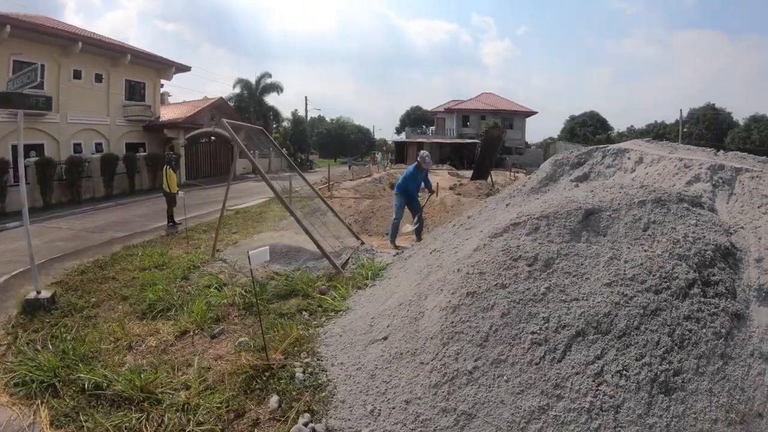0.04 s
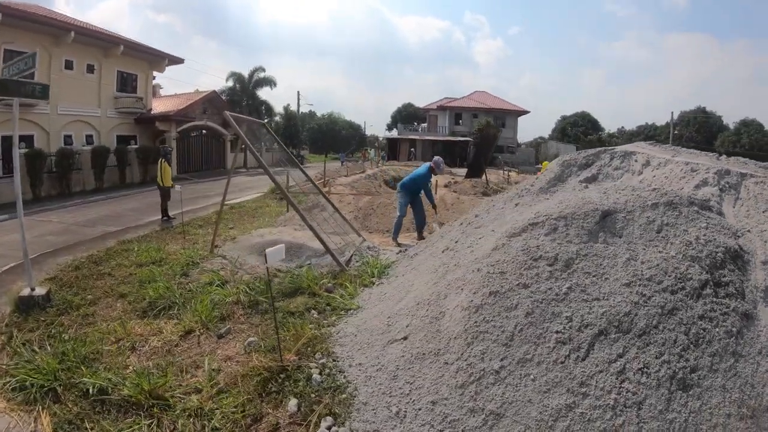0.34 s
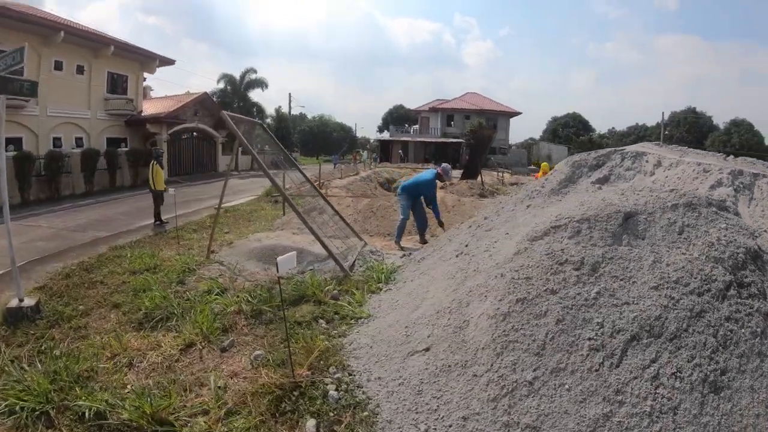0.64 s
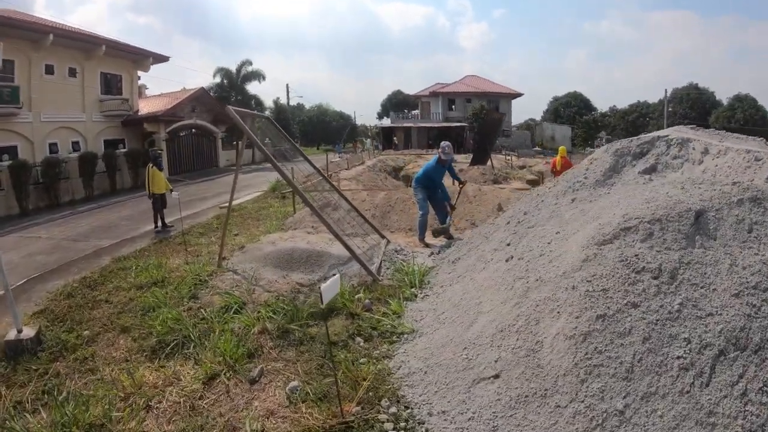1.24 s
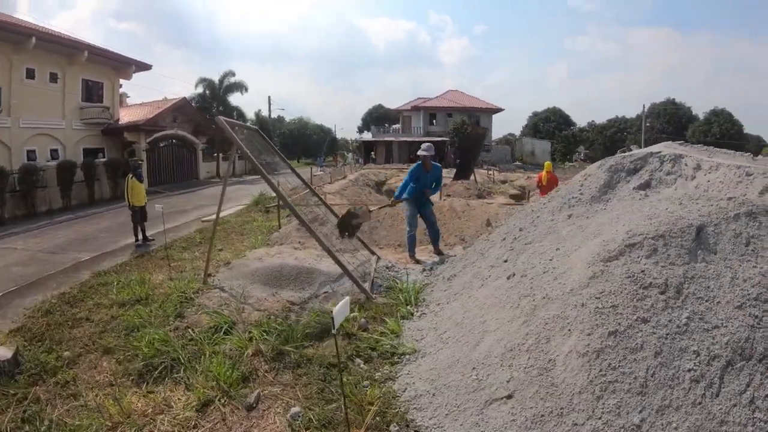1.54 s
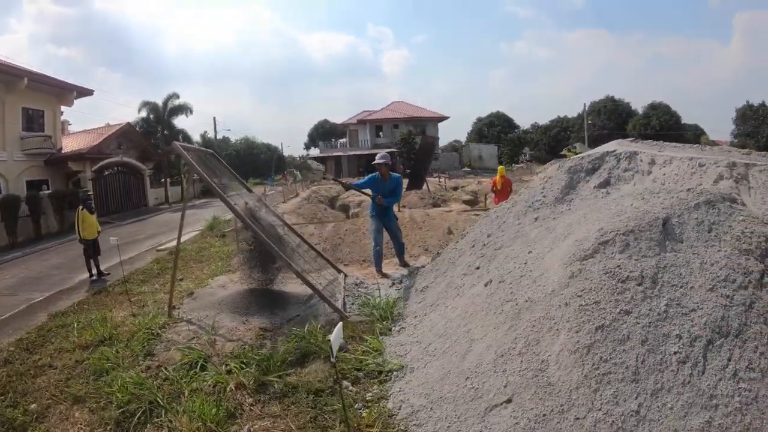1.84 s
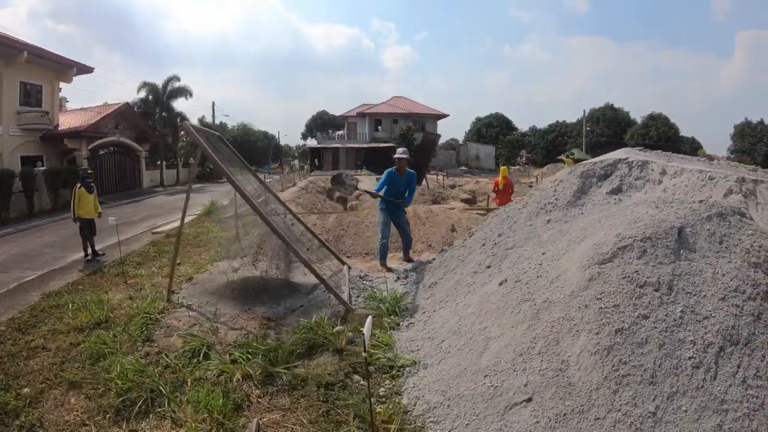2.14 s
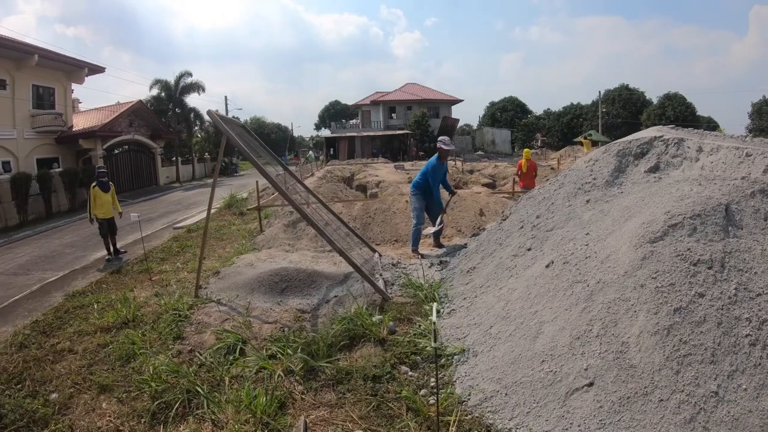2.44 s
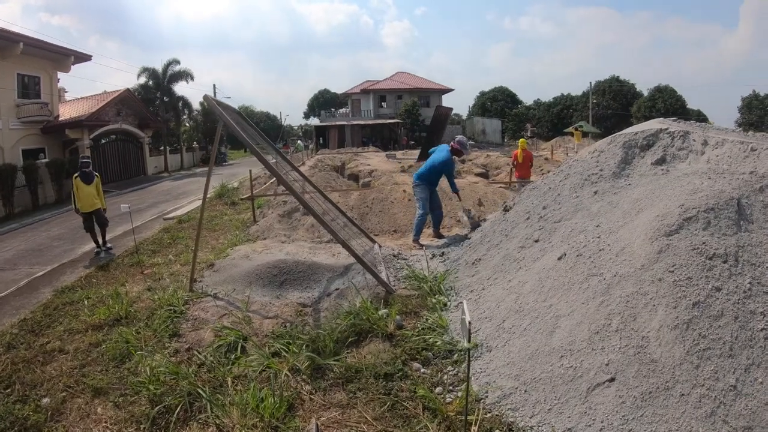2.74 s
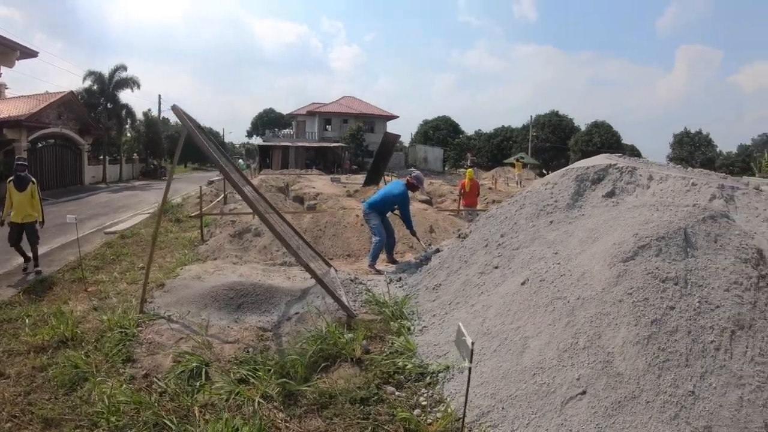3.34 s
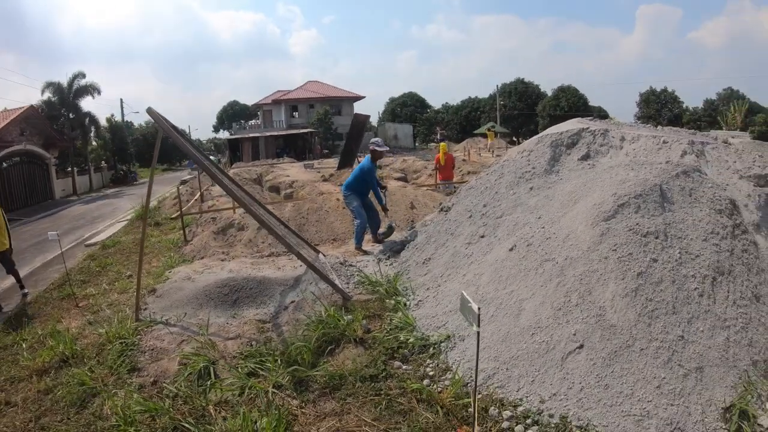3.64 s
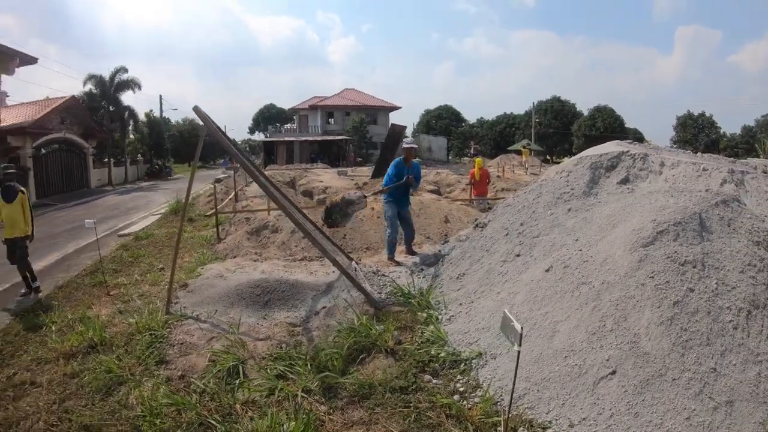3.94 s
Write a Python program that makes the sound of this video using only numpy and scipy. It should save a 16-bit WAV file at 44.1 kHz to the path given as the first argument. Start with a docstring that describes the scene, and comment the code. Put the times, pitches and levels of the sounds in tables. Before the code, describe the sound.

At an outdoor building site, sand hisses against wire mesh three times, the middle throw lasting longest. A shovel bites, scrapes and spills grit in between, with a few close knocks and low wind on the microphone.

```python
"""Gravelly sand, thrown by the shovelful, hisses on a sloped wire screen at an outdoor building site.
Grains pelt the mesh and ring its frame while the fine sand pours through. Between throws the blade
crunches into the heap, scrapes under it and lifts, spilling grit and chinking on stones.
A few sharp knocks sound close by, and wind rocks the microphone over faint outdoor air."""
import sys
import numpy as np
from scipy import signal
from scipy.fft import rfft, irfft, next_fast_len
from scipy.io import wavfile
from scipy.ndimage import map_coordinates

SR = 44100
rng = np.random.default_rng(int(sys.argv[2]) if len(sys.argv) > 2 else 0)


def wav_record(signal):
    """Record a signal, one row per channel, as 16-bit PCM in the file named by sys.argv[1]."""
    frames = np.transpose(np.atleast_2d(signal))
    bounded = np.clip(frames, -1, 1)
    # unit amplitude maps onto the largest positive 16-bit level
    quanta = np.round(bounded * 32767).astype(np.int16)
    wavfile.write(sys.argv[1], SR, quanta)


N = 176400
KNOCK_ATTACK_S = .0012


def amp(db):
    """Decibels to gain."""
    return 10 ** (np.asarray(db) / 20)


def unit(x):
    """Scale to rms 1."""
    return x / np.sqrt(np.mean(x ** 2) + 1e-20)


def curves(rows):
    """Automation lanes: one value per sample for each column after the time."""
    times, *columns = np.transpose(rows)
    return [np.interp(np.arange(N) / SR, times, column) for column in columns]


def wobble(per_s):
    """Smooth random modulation with per_s knots a second."""
    return map_coordinates(rng.standard_normal(1024), [np.arange(N) * per_s / SR], mode="wrap")


def filtered(x, response):
    """Filter x by a complex frequency response."""
    size = 2 * next_fast_len(N * 2 // 3)
    return irfft(rfft(x, size) * response(np.fft.rfftfreq(size, 1 / SR)), size)[:N]


def colour(points):
    """Minimum-phase EQ through (freq_hz, gain_db) points."""
    def response(hz):
        freq_hz, gain_db = np.transpose(points)
        gain = amp(np.interp(np.log(hz + 1), np.log(freq_hz + 1), gain_db))
        cepstrum = irfft(np.log(gain))
        cepstrum[1:len(hz) - 1] *= 2
        cepstrum[len(hz):] = 0
        return np.exp(rfft(cepstrum))
    return response


def resonances(modes):
    """Response of a resonator bank of (pitch_hz, width_hz, gain_db) modes."""
    return lambda f: sum(amp(db) * 1j * f * width / (hz * hz - f * f + 1j * f * width)
                         for hz, width, db in modes)


def noise(points):
    """Coloured noise of rms 1."""
    return unit(filtered(rng.standard_normal(N), colour(points)))


def grains(response, per_s, scatter_db):
    """Random impacts of grains of scattered size, heard through a response, rms 1."""
    struck = rng.random(N) < per_s / SR
    size = amp(scatter_db * np.minimum(rng.standard_normal(N), np.e))
    polarity = np.sign(rng.standard_normal(N))
    return unit(filtered(struck * size * polarity, response))


def strokes(rows):
    """Gain envelope of attack-hold-release strokes."""
    t = np.arange(N) / SR
    return sum(amp(db) * np.clip((t - start) / attack, 0, 1)
               * np.clip(1 - (t - start - attack - hold) / release, 0, 1) ** 2
               for start, attack, hold, release, db in rows)


def ring(modes, t, detune=.015):
    """Damped modes, a little different in level and pitch at every blow."""
    return sum(amp(db + rng.normal(0, 1) - 60 * t / t60)
               * np.sin(2 * np.pi * (hz * (1 + detune * rng.normal()) * t + rng.random()))
               for hz, db, t60 in modes)


def air(level_db=-50, drift_db=.5):
    """A faint outdoor bed whose level drifts gently."""
    # tone of the open air: freq_hz, gain_db
    air_eq = [(60, -14), (130, 6.5), (210, -4), (400, 3.5), (650, 1), (1000, -2), (1500, -2.5), (2500, -13),
              (4000, -15), (7000, -21), (15000, -27)]
    return amp(level_db + drift_db * wobble(5.22)) * noise(air_eq)


def wind(sway_db=-13, buffet_db=2.6):
    """Slow pressure swings at the microphone, with rumble and low swells in the gusts."""
    # rise and fall of the gusts: time_s, rumble_db
    gusts = [(.15, -34), (.41, -26.5), (.56, -35.5), (.8, -46.5), (1.15, -37.5), (1.32, -31.5), (1.6, -41),
             (1.95, -32.5), (2.28, -30.5), (2.48, -37), (3, -37), (3.42, -32.5), (3.8, -32), (3.89, -35)]
    # dull low swells: start_s, attack_s, hold_s, release_s, level_db
    swells = [(.32, 0.014, 0.078, .15, -45), (3.77, 0.0087, 0.018, 0.042, -46)]
    # tone of the sway, the rumble and the swells: freq_hz, gain_db
    sway_eq = [(1, -10.5), (4, 1), (11, -0.5), (20, -24), (100, -120)]
    rumble_eq = [(10, -9.5), (20, -3.5), (32, 0.5), (50, -10.5), (70, -16.5), (100, -29.5), (200, -36.5),
                 (400, -37), (2000, -110)]
    swell_eq = [(50, -3), (90, 0), (150, -2), (230, -13), (340, -15), (900, -45)]
    rumble_db, = curves(gusts)
    sway = amp(sway_db) * noise(sway_eq)
    rumble = amp(rumble_db + buffet_db * wobble(8.96)) * noise(rumble_eq)
    return sway + rumble + strokes(swells) * noise(swell_eq)


def yard(x, t60_s=.053, wet_db=-9.5):
    """A weak, short answer from the heaps and house walls."""
    t = np.arange(SR // 2) / SR
    tail = rng.standard_normal(len(t)) * amp(-60 * t / t60_s)
    return amp(wet_db) * signal.fftconvolve(x, tail / np.linalg.norm(tail))[:N]


def knocks(crack_t60_s=.034):
    """Hard contacts nearby: a hollow ring, a low thud and a gritty crack in varying shares."""
    # each knock's blend, ahead of the mix gains: start_s, body_db, thud_db, crack_db
    hits = [(0.661, -54, -30.5, -66), (0.753, -33, -32, -45), (3.7, -17, -17, -28.5),
            (3.7071, -30, -30, -30), (3.72, -29, -34, -30.5), (3.725, -53, -30, -46),
            (3.74, -33.5, -44, -39.5), (3.821, -40, -38, -43)]
    # modes of the hollow body and of the thud: pitch_hz, gain_db, t60_s
    body_modes = [(870, -20, 0.018), (1180, -8, 0.049), (1359, 3, 0.035), (1567, 1.5, 0.053),
                  (1725, -0.5, 0.039), (2200, -6.5, 0.033)]
    thud_modes = [(360, 1.5, .04), (490, 2, .035), (700, -8, .025)]
    # tone of the crack: freq_hz, gain_db
    crack_eq = [(200, -12), (900, 10.5), (2500, -2.5), (4500, -1), (7000, 1), (9500, -11.5), (15000, -17)]
    t = np.arange(SR // 8) / SR
    rise = 1 - np.exp(-(t / KNOCK_ATTACK_S) ** 2)
    rings, cracks = np.zeros((2, N + SR))
    for start_s, body_db, thud_db, crack_db in hits:
        at = slice(round(start_s * SR), round(start_s * SR) + len(t))
        rings[at] += (amp(body_db) * ring(body_modes, t) + amp(thud_db) * ring(thud_modes, t)) * rise
        cracks[at] += amp(crack_db - 60 * t / crack_t60_s) * rise * rng.standard_normal(len(t))
    return .5 * rings[:N] + 2 * filtered(cracks[:N], colour(crack_eq))


def falling_knock(start_s=2.1062, length_s=.018, from_hz=3000, to_hz=400, glide_s=.0034, level_db=-28):
    """One short, rough knock sweeps quickly down in pitch."""
    t = np.clip(np.arange(N) / SR - start_s, 0, length_s)
    pitch_hz = to_hz + (from_hz - to_hz) * np.exp(-t / glide_s)
    envelope = np.minimum(t / KNOCK_ATTACK_S, 1) * (1 - (t / length_s) ** 2)
    roughness = .6 * wobble(1400)
    return amp(level_db) * envelope * np.sin(2 * np.pi * np.cumsum(pitch_hz) / SR + roughness)


def bright_hits(attack_s=.0006, snap_t60_s=.0055):
    """Bright hits: a single stone chinks against the blade, and one close knock adds a hard snap and a brief
    bright ring."""
    # bright hits, a stone chink and a close knock: start_s, ring_db, snap_db
    hits = [(3.4418, -28, -41), (3.7212, -31.5, -19)]
    # bright modes of the steel: pitch_hz, gain_db, t60_s
    steel_modes = [(4240, -6, 0.019), (5780, -1.5, 0.017), (6630, 3, .01), (7500, 2.5, 0.0083),
                   (8520, 2, 0.011), (9900, -6, 0.0082)]
    t = np.arange(SR // 20) / SR
    rise = 1 - np.exp(-t / attack_s)
    out = np.zeros(N + SR)
    for start_s, ring_db, snap_db in hits:
        snap = amp(snap_db - 60 * t / snap_t60_s) * rng.standard_normal(len(t))
        out[round(start_s * SR):][:len(t)] += (amp(ring_db) * ring(steel_modes, t) + snap) * rise
    return out[:N]


def scrapes(attack_s=.02, rasp_release_s=.33, ring_release_s=.18, sag_per_s=.16, judder_db=2):
    """The blade judders under the heap: its edge rasps, sinks in pitch and fades as the blade rings."""
    # pushes under the heap: start_s, rasp_hold_s, ring_hold_s, rasp_db, ring_db
    pushes = [(0.747, 0.06, .42, -58, -54.5), (3.002, 0.12, 0.34, -56, -54)]
    # resonances of the edge and of the whole blade: pitch_hz, width_hz, gain_db
    edge_modes = [(2280, 300, -3), (3120, 160, -3), (3750, 170, 3), (5050, 250, -6)]
    blade_modes = [(415, 110, -1), (1325, 95, 3), (1690, 170, -4), (2200, 250, -11)]

    def steel(modes, cutoff_hz=6100):
        """Grit excites the steel's modes, muffled by a low-pass."""
        muffle = lambda f: 1 / (1 + 1j * np.sqrt(2) * f / cutoff_hz - (f / cutoff_hz) ** 2)
        return grains(lambda f: resonances(modes)(f) * muffle(f), per_s=3000, scatter_db=3.5)

    t = np.arange(N) / SR
    buried_s = sum((t - s) * (t > s) * (t < s + 1) for s, *_ in pushes)
    pitch_ratio = 1 - sag_per_s * buried_s
    edge = map_coordinates(steel(edge_modes), [np.cumsum(pitch_ratio)])
    rasp_gain = strokes([(s, attack_s, hold, rasp_release_s, db) for s, hold, _, db, _ in pushes])
    ring_gain = strokes([(s, attack_s, hold, ring_release_s, db) for s, _, hold, _, db in pushes])
    return (edge * rasp_gain + steel(blade_modes) * ring_gain) * amp(judder_db * wobble(55))


def shovel(crunch_db=1.2, trickle_db=2.1):
    """The blade bites into the heap with a crunch and spills grit on the way up."""
    # bites and spills: start_s, attack_s, hold_s, release_s, level_db
    bites = [(.3, 0.04, 0.049, 0.058, -38.5), (.47, 0.014, 0.0088, 0.036, -47),
             (2.765, 0.034, 0.086, 0.039, -42)]
    spills = [(1.15, 0.017, 0.048, 0.045, -55.5), (1.22, 0.038, 0.015, 0.046, -47),
              (1.28, .03, 0.2, 0.094, -55.5), (3.37, 0.033, 0.11, 0.023, -54),
              (3.44, 0.038, 0.026, 0.021, -49.5), (3.5, 0.0072, 0.026, .12, -52.5),
              (3.72, 0.014, 0.076, 0.086, -54.5)]
    # tone of the crunch and of the falling grit: freq_hz, gain_db
    bite_eq = [(200, -25), (1350, -14), (1650, 5), (2100, 6.5), (2600, -12), (3100, 5.5), (4900, 5.5),
               (6200, 1), (9000, -2), (15000, -16.5)]
    spill_eq = [(500, 1.5), (2500, -9), (4500, -4.5), (6800, 1.5), (9000, -3.5), (15000, -19)]
    crunch = grains(colour(bite_eq), per_s=5000, scatter_db=2.5) * amp(crunch_db * wobble(60))
    grit = grains(colour(spill_eq), per_s=2300, scatter_db=0) * amp(trickle_db * wobble(80))
    return crunch * strokes(bites) + grit * strokes(spills)


def screen(low_cut_hz=920, clump_db=1.1, surge_db=.7):
    """Grains pelt the wire mesh in clumps and ring its frame while fine sand pours on to the pile."""
    # sand flow over three throws: time_s, hiss_db, pour_db
    flow = [(.28, -42.5, -51.5), (.49, -43, -44.5), (.55, -50, -50.5), (.68, -54.5, -54),
            (.78, -62.5, -51.5), (1.39, -65.5, -66), (1.44, -50, -49), (1.525, -37.5, -51),
            (1.63, -37.5, -45), (1.75, -42.5, -47.5), (1.82, -41.5, -49.5), (1.95, -44.5, -48),
            (2.1, -41.5, -48), (2.23, -38.5, -51), (2.42, -39, -48.5), (2.54, -44.5, -79), (2.75, -44, -61),
            (2.92, -46.5, -87), (3.05, -61.5, -56.5), (3.895, -60, -64), (3.92, -41.5, -59),
            (3.95, -33.5, -56), (4, -39, -48)]
    # a load lands and rings the frame: start_s, attack_s, hold_s, release_s, level_db
    landings = [(1.48, 0.053, 0.46, 0.28, -48.5)]
    # tone of the hiss on the mesh and of the pour through it: freq_hz, gain_db
    hiss_eq = [(300, -3.5), (1500, -1), (2600, -1.5), (4000, -1.5), (5500, -2.5), (8500, -6),
               (11500, -14.5), (15500, -24)]
    pour_eq = [(100, -19), (220, -9), (400, 0.5), (850, -2), (1400, -9.5), (1800, -8), (2600, -22),
               (6000, -31)]
    # resonances of the wires and of the frame: pitch_hz, width_hz, gain_db
    wire_modes = [(2050, 630, -7), (3420, 360, -21.5), (3633, 550, -1.5), (4800, 136, -0.5),
                  (5920, 300, -12.5), (8340, 160, -11.5)]
    frame_modes = [(1170, 80, 4), (3150, 170, -1), (3800, 150, -4)]
    low_cut = lambda f: 1j * f / (low_cut_hz + 1j * f)
    mesh = lambda f: colour(hiss_eq)(f) * (1 + resonances(wire_modes)(f)) * low_cut(f)
    hiss = grains(mesh, per_s=6000, scatter_db=2.5)
    pour = grains(colour(pour_eq), per_s=3600, scatter_db=4)
    frame = grains(resonances(frame_modes), per_s=900, scatter_db=4)
    hiss_db, pour_db = curves(flow)
    hiss *= amp(hiss_db + clump_db * wobble(45) + surge_db * wobble(14))
    pour *= amp(pour_db + wobble(30.1))
    frame *= strokes(landings) * amp(clump_db * wobble(20))
    return hiss + pour + frame


def scene():
    """The work in its yard, the outdoor air and the wind, in mono."""
    work = screen() + shovel() + scrapes() + knocks() + falling_knock() + bright_hits()
    return (air() + work + yard(work) + wind())[None]


def record(dry):
    """A steep low-pass trims the very top of the treble."""
    cutoff_hz = 15720
    return signal.sosfiltfilt(signal.ellip(10, .05, 60, cutoff_hz, fs=SR, output="sos"), dry)


dry = scene()
out = record(dry)
wav_record(out)
```